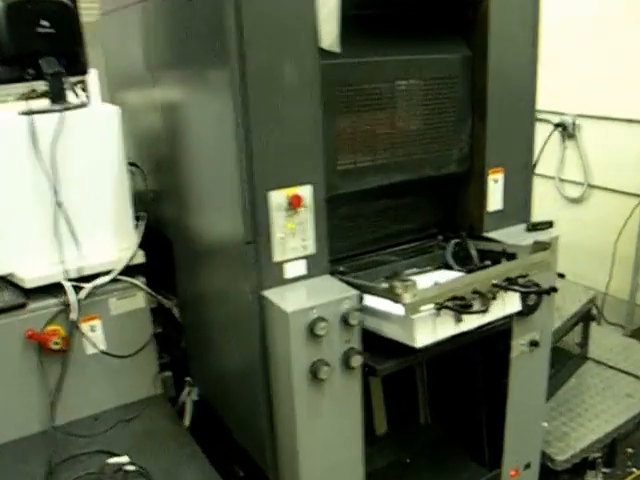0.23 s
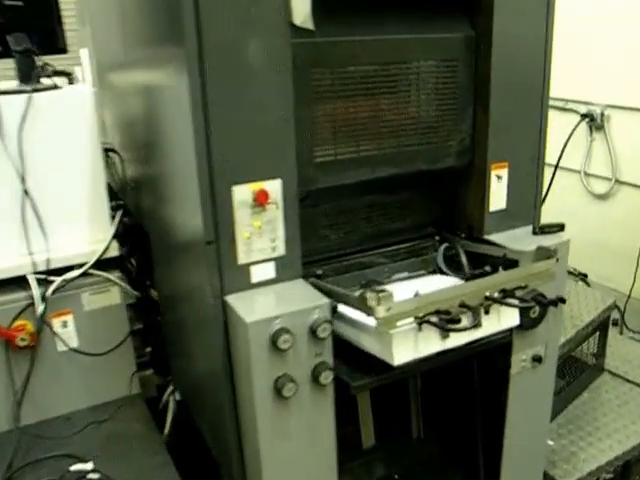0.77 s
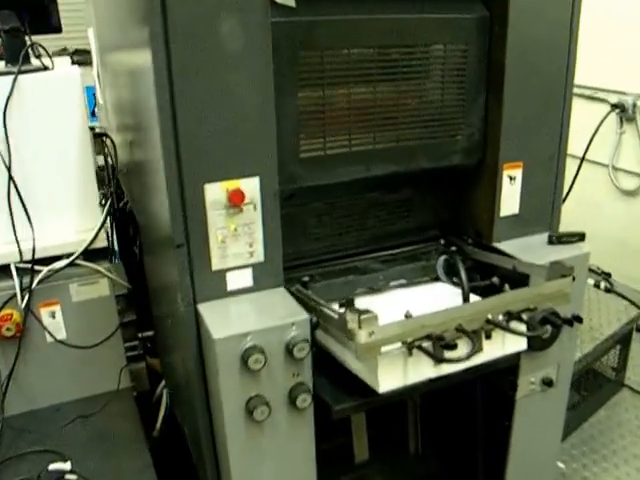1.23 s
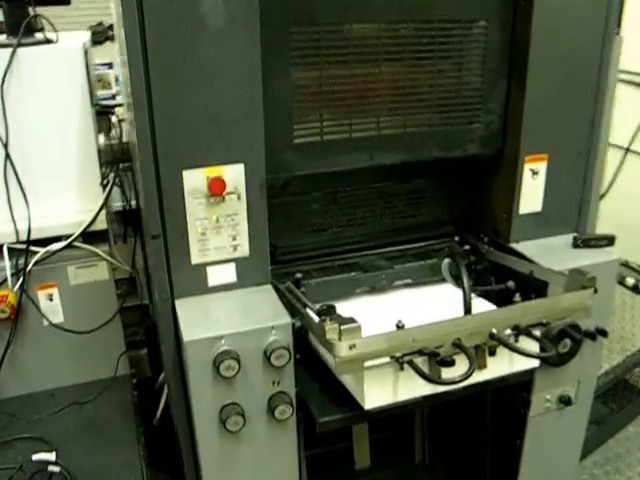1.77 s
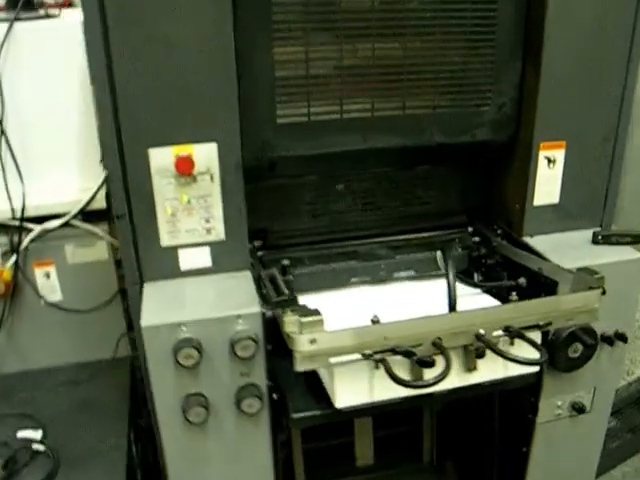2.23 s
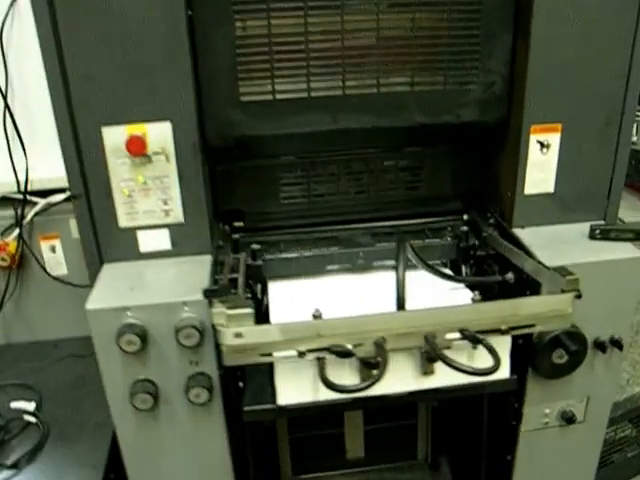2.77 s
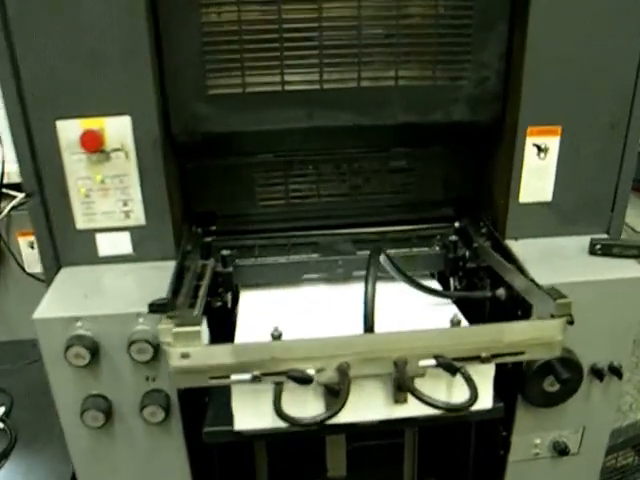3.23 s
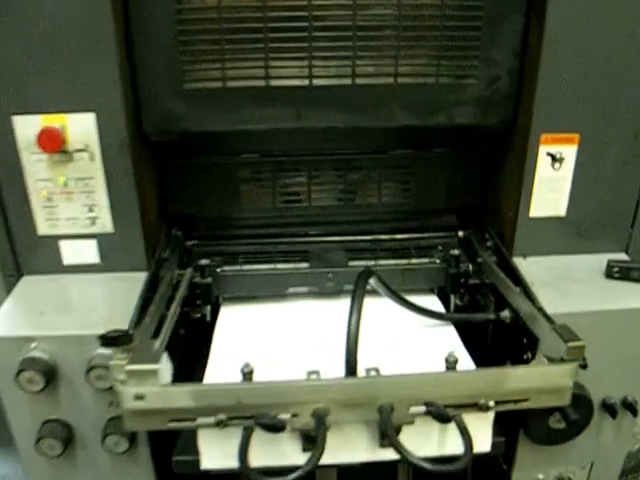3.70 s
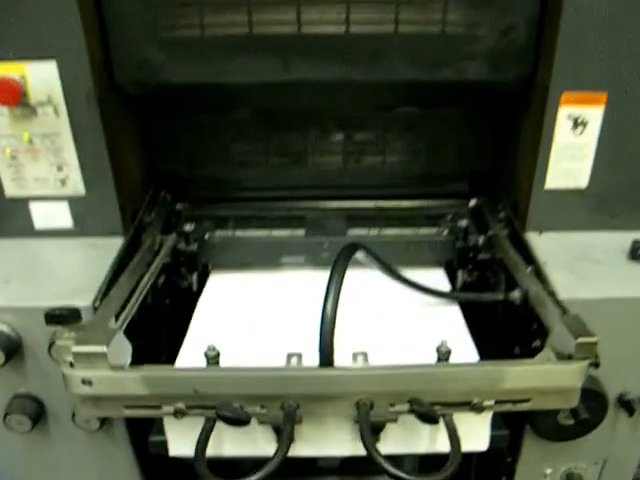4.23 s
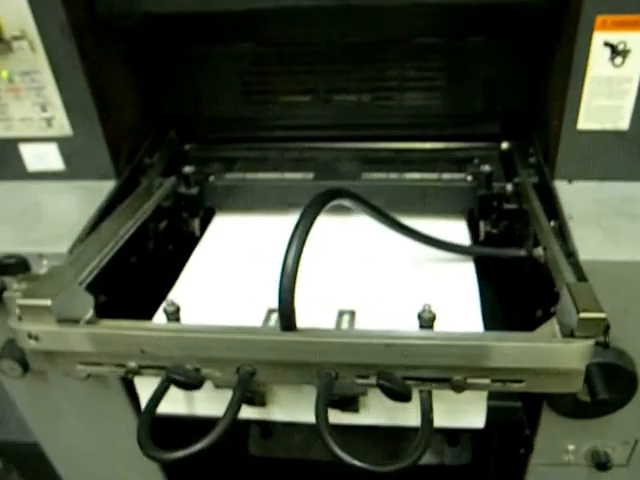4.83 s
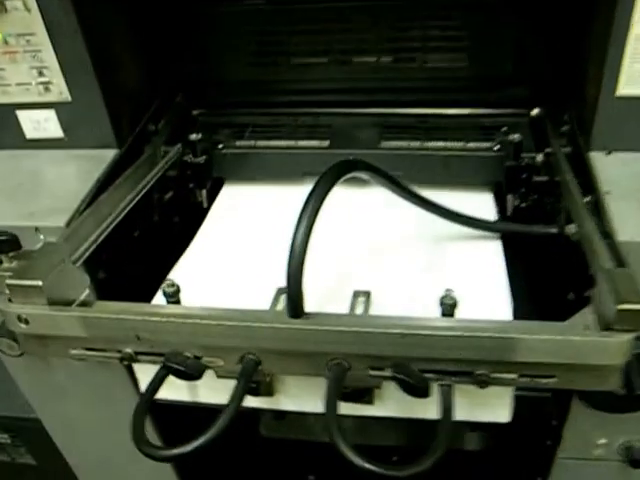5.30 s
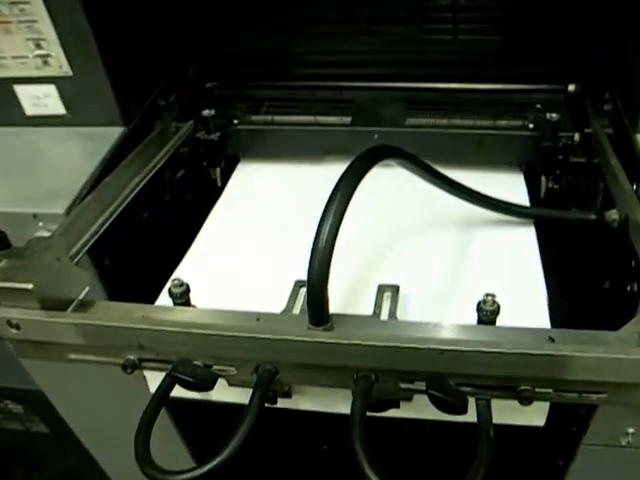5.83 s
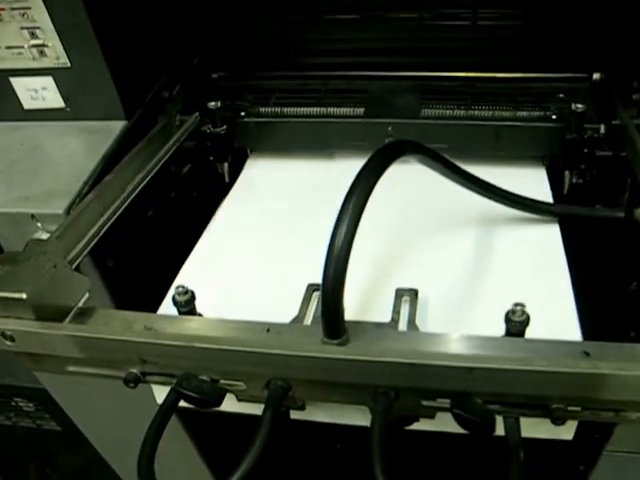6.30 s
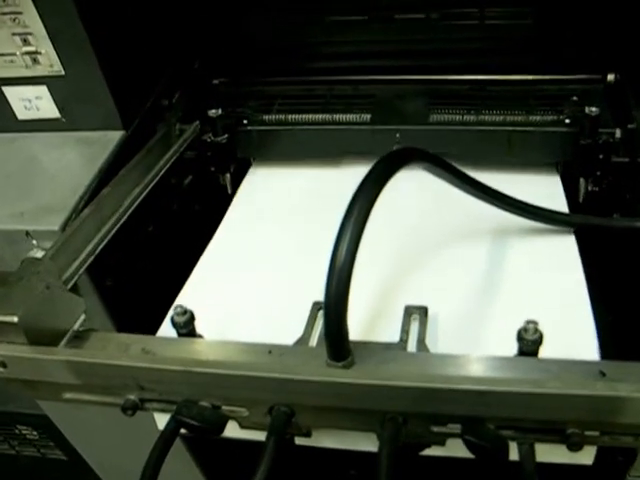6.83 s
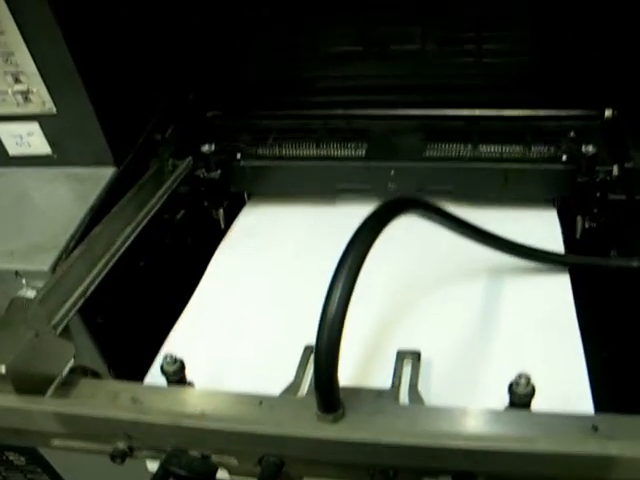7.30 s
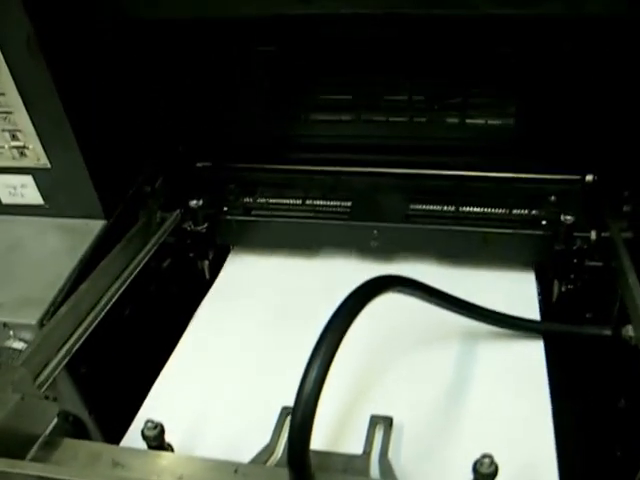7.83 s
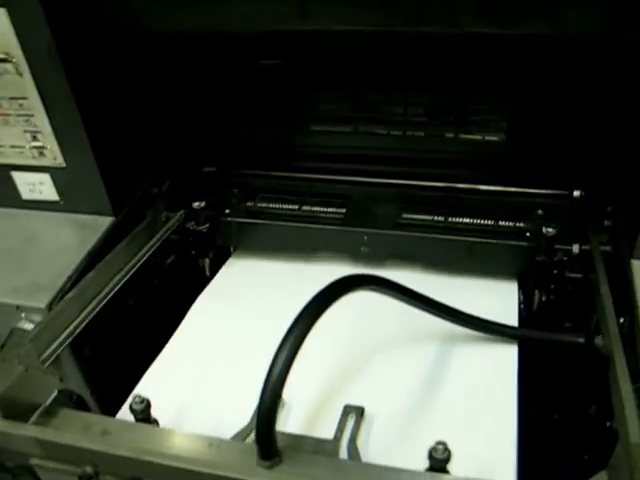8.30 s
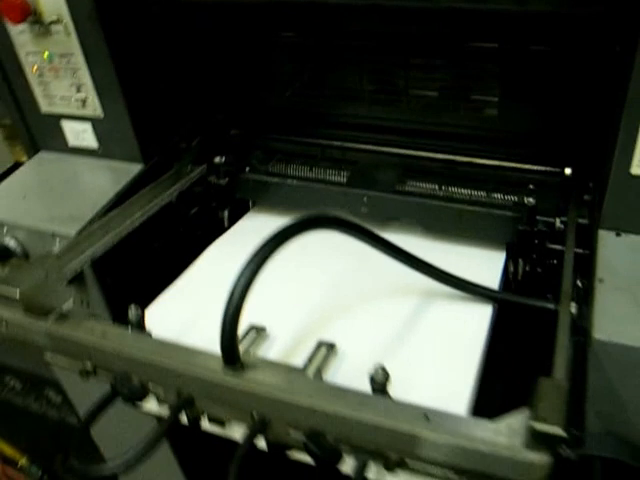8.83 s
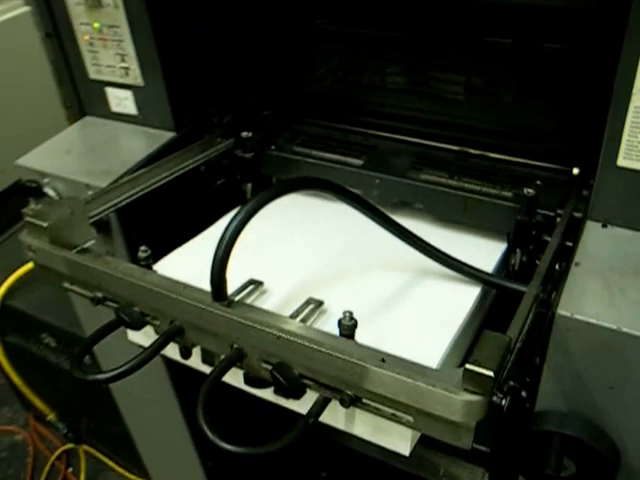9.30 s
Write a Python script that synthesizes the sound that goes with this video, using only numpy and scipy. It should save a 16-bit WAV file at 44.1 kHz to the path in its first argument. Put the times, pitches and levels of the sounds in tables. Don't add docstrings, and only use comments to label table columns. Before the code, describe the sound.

A printing press runs in an indoor shop. About twice a second a gripper clamp clacks loudly, followed by the same quick train of slaps, knocks, snaps and clicks. Rollers roar with chain rattle, suction valves puff, and frame, pump and gears hum beneath. A small, dull-sounding microphone moves closer, overloading on the clamps and dipping briefly after each.

```python
import sys
import numpy as np
from scipy import signal
from scipy.fft import rfft, irfft, next_fast_len
from scipy.io import wavfile
from scipy.ndimage import uniform_filter1d, map_coordinates

SR = 44100
rng = np.random.default_rng(int(sys.argv[2]) if len(sys.argv) > 2 else 0)


def wav_record(signal):
    frames = np.transpose(np.atleast_2d(signal))
    bounded = np.clip(frames, -1, 1)
    quanta = np.round(bounded * 32767).astype(np.int16)
    wavfile.write(sys.argv[1], SR, quanta)


def ratio_of_db(decibels):
    return 10 ** (np.asarray(decibels, float) / 20)


N = 421155
T = np.arange(N) / SR

# time in s, peak in dB, jaws in dB, seating blow in dB,
# overload tick in dB.
CLAMP = [(0.052, -13.5, 0, -7.5, -77.5), (0.565, -5.5, -7, -7, -36), (1.078, -6, -7, -9.5, -35),
         (1.589, -3, -11.5, -11.5, -30), (2.102, -5, -8.5, -7.5, -32), (2.614, -4.5, -2, -4.5, -24),
         (3.126, -5.5, -1.5, -6.5, -27), (3.638, -4, -6.5, -7, -33), (4.15, -4.5, -6.5, -3, -25.5),
         (4.662, -5, -11, -5, -32), (5.174, -4, -9, -4, -30.5), (5.685, -5, -3, -8, -25),
         (6.197, -5.5, -3, -5.5, -25), (6.707, -2.5, -13.5, -6, -35.5), (7.22, -5.5, -7, -5, -34.5),
         (7.731, -5.5, -2, -10.5, -28.5), (8.243, -6.5, -17, -5.5, -39), (8.754, -5, -4.5, -9, -38.5),
         (9.267, -5, -9, -9, -33)]
# delay after it in s, level from afar in dB,
# level from near in dB, scatter in dB, share of crack (a ratio).
TRAIN = [
    (.035, -21.5, -13, 1, 0.26),
    (.0395, -16, -3.5, 1.9, .03),
    (.217, -13, -19, 2, 1.1),
    (.260, -19.5, -12.5, 2, 0.3),
    (.308, -11.5, -10.5, 0.6, 2.6),
    (0.338, -19.5, -17, -1, 0.81),
    (.350, -22.5, -11, 1.5, .23),
    (.393, -16, -10, -0.2, .21),
    (0.423, -12.5, -6, 3.8, .4),
    (.431, -14.5, -14, -0.6, .55),
]
# time in s, roller roar in dB, suction air in dB.
RUN = [(0.0, -15.5, -20.5), (9.55, -18.5, -21.5)]


def unit(x):
    return x / np.sqrt(np.mean(x ** 2) + 1e-20)


def curves(rows, at=T):
    s, *columns = np.transpose(rows)
    return [np.interp(at, s, column) for column in columns]


def wobble(rate):
    knots = rng.standard_normal(int(N * rate / SR) + 4)
    return map_coordinates(knots, [T * rate])


def coloured(x, points):
    m = next_fast_len(N + 8192)
    hz, db = np.transpose(points)
    log_hz = np.log(np.fft.rfftfreq(m, 1 / SR) + 1)
    gain = ratio_of_db(np.interp(log_hz, np.log(hz + 1), db))
    return irfft(rfft(x, m) * gain, m)[..., :N]


def since_clamp():
    s = np.transpose(CLAMP)[0] - .002
    s = np.r_[2 * s[0] - s[1], s]
    return T - s[np.searchsorted(s, T, side="right") - 1]


def swells(centre, width):
    turn_s = np.diff(np.transpose(CLAMP)[0]).mean()
    away = (since_clamp() - centre[:, None] + turn_s / 2) % turn_s - turn_s / 2
    return np.exp(-(away / width[:, None]) ** 2)


def contacts(events, ring, crack, rise=0.0011, lead=0.001753, scatter=0.7):
    out = np.zeros(N + SR)
    t = np.arange(SR // 10) / SR
    hz, level_db, t60 = np.transpose(ring)[:, :, None]
    for s, db in events:
        luck = scatter * rng.standard_normal((3, len(ring), 1))
        decay = ratio_of_db(level_db + 1.7 * luck[0] - 60 * t / t60)
        modes = decay * np.sin(2 * np.pi * hz * (1 + .02 * luck[1]) * t + luck[2])
        snap = crack * ratio_of_db(-60 * t / 0.036) * rng.standard_normal(len(t))
        onset = 1 - np.exp(-t / rise)
        out[round((s - lead) * SR):][:len(t)] += ratio_of_db(db) * (modes.sum(0) + snap) * onset
    return out[:N]


def gripper_clamp():
    # frequency in Hz, level in dB, t60 in s.
    clamp_ring = [(330, -17, .04), (665, -2, .04), (790, 2, .035), (880, -4, .03), (1080, -12, .025),
                  (1370, -10, .03), (2450, -16, .015), (2950, -18, .015)]
    jaw_ring = [(1250, -2.5, 0.0071), (2470, 1, 0.011), (2900, -4, 0.0053), (3460, -3, .006)]
    seat_ring = [(900, -17, 0.037), (1424, 4.5, 0.035), (1474, -7, .03), (1660, 5.5, 0.023),
                 (2060, -14.5, 0.017)]
    s, boom_db, jaw_db, seat_db, _ = np.transpose(CLAMP)
    boom = contacts(zip(s, boom_db + 3.0), clamp_ring, crack=0.21, rise=0.00049, lead=.0006, scatter=0.38)
    jaws = contacts(zip(s - .0012, jaw_db - 1.5), jaw_ring, crack=0.27, rise=0.00049, lead=0.00032)
    seat = contacts(zip(s + 0.0046, seat_db - 3.5), seat_ring, crack=0.59)
    return boom + jaws + seat


def train_timing():
    # time in s, nearness (0 afar to 1 near).
    nearness = [(0, 0.0087), (2.1, 0.48), (4.2, 1), (6.2, 1.16), (9.55, 0.75)]
    # time in s, change in dB.
    hard = [(.091, 6), (.600, 3), (.785, 7.5), (.902, -5.5), (1.298, 12.5), (4.458, -3), (2.015, -7),
            (2.362, 10), (2.53, -1.5), (2.949, 4.5), (3.045, 3.5), (3.551, 0), (4.062, 1), (4.544, 3.5),
            (4.574, 0.5), (5.055, 1), (5.566, 3), (5.899, 9), (7.528, -1.5), (6.59, -0.5), (6.62, 1.5),
            (7.017, -1), (7.132, 3), (7.14, 0), (7.644, -3), (8.154, -3.5), (8.552, 1), (8.668, 2.5),
            (9.061, -6.5), (9.18, -7)]
    play_s = .001
    clamp_s = np.transpose(CLAMP)[0]
    delay, far_db, near_db, scatter_db, _ = np.transpose(TRAIN)[:, :, None]
    luck = rng.standard_normal((2, len(TRAIN), len(CLAMP)))
    s = clamp_s + delay + play_s * luck[0]
    db = far_db + (near_db - far_db) * curves(nearness, s)[0] + scatter_db * luck[1]
    for when, more_db in hard:
        nearest = np.abs(clamp_s + delay - when).argmin()
        s.flat[nearest] = when
        db.flat[nearest] += more_db
    return s, db


def contact_train():
    # frequency in Hz, level in dB, t60 in s.
    slap_ring = [(1310, -8, 0.034), (2360, -0.5, 0.03), (2920, -4, 0.039)]
    bounce_ring = [(567, 2.4, 0.022)]
    lift_ring = [(696, -9.5, 0.028), (1330, -11.5, 0.017), (2420, -11, .02), (3170, -7, 0.022)]
    puff_ring = [(630, 1, 0.026), (1030, -4.5, 0.059), (2320, -15, 0.017)]
    snap_ring = [(730, -2.5, 0.009), (1290, -4.5, 0.028), (2050, -11, 0.03), (2286, -6, 0.058),
                 (2968, -6, 0.03), (3300, -13.5, 0.018), (3400, -6, 0.036)]
    cam_ring = [(1280, -3, 0.057), (1810, -1, 0.12), (2320, 0, 0.045), (2407, -0.5, 0.03),
                (2660, -10.5, 0.015)]
    knock_ring = [(133, -12, 0.016), (413, -12, 0.023), (561, -5.5, 0.097), (647, -0.5, .06),
                  (895, -1, 0.0097), (1110, -3.5, 0.045), (1580, -4.5, 0.04)]
    link_ring = [(770, -7.5, 0.018), (950, -11, 0.13), (1212, -2, 0.049), (1300, 0.5, 0.011),
                 (2350, -8, 0.03)]
    stop_ring = [(580, -8.5, 0.058), (1210, -5.5, 0.012), (1279, -0.5, 0.028), (1900, -6.5, 0.009),
                 (3630, -14, 0.019)]
    tick_ring = [(130, -12, 0.043), (326, 3, 0.069), (497, 8, 0.011), (1360, -.5, 0.026), (2850, -1, 0.046),
                 (2907, -4.5, .025), (3220, -7, 0.016), (3700, -9.5, .015)]
    rings = [slap_ring, bounce_ring, lift_ring, puff_ring, snap_ring,
             cam_ring, knock_ring, link_ring, stop_ring, tick_ring]
    clatter = np.zeros(N)
    for s, db, ring, part in zip(*train_timing(), rings, TRAIN):
        clatter += contacts(zip(s, db), ring, crack=part[-1])
    return clatter


def patchy(depth_db):
    z = signal.stft(rng.standard_normal(N + 512), nperseg=512)[2]
    field = uniform_filter1d(rng.standard_normal(z.shape), size=4, axis=0)
    field = uniform_filter1d(field, size=6, axis=1)
    return signal.istft(z * ratio_of_db(depth_db * unit(field)), nperseg=512)[1][:N]


def rollers():
    # time after the clamp in s, half width in s, swell in dB.
    load = [(.015, .03, 2.5), (.235, 0.033, 2.86), (0.352, 0.025, 4), (0.419, 0.048, 3.2),
            (.475, 0.027, -1.5), (.503, .008, -1)]
    # frequency in Hz, density in dB per Hz.
    roar_colour = [(60, -43.5), (100, -31.5), (130, -15), (180, -6), (280, -3), (420, 1), (500, -3),
                   (700, -2.5), (1200, -8), (2000, -10.5), (3000, -16.5), (4500, -20)]
    at, width, more_db = np.transpose(load)
    load_db = -1.1 + more_db @ swells(at, width)
    chance = rng.random((3, N))
    struck = chance[0] < 600 / SR
    rattle = struck * np.sign(chance[1] - .5) * ratio_of_db(-4 * np.log(chance[2] + 0.021))
    roar = unit(coloured(patchy(depth_db=1.0) + 0.6 * unit(rattle), roar_colour))
    return ratio_of_db(curves(RUN)[0] + load_db) * roar


def suction_air():
    # time after the clamp in s, half width in s, blast in dB.
    valves = [(.21, 0.12, -1.5), (.268, 0.041, 0.5), (.33, .02, -6), (.42, 0.023, -5.5), (.46, .025, -.5),
              (.492, 0.012, 4)]
    # frequency in Hz, density in dB per Hz.
    air_colour = [(300, -38.5), (700, -6), (1200, -13), (1900, -19.5), (2500, -3.5), (3200, -10.5),
                  (4500, -6.5)]
    at, width, open_db = np.transpose(valves)
    leak_db = -6.5
    blast = ratio_of_db(leak_db) + ratio_of_db(open_db) @ swells(at, width)
    air = unit(coloured(patchy(depth_db=2.0), air_colour))
    return blast * ratio_of_db(curves(RUN)[1] + 0.32 * wobble(36)) * air


def tone(hz, db, drift):
    phase = 2 * np.pi * np.cumsum(hz + 0 * T) / SR
    return np.sqrt(2) * ratio_of_db(db) * np.sin(phase + drift * wobble(9))


def frame_drone():
    # time after the clamp in s, half width in s, fundamental in dB,
    # octave in dB.
    frame = [(.01, 0.02, -47, -35), (.058, 0.025, -24.5, -42), (.165, .02, -43.5, -26.5),
             (0.219, 0.017, -34.5, -24.5), (.27, .014, -26.5, -30), (.30, 0.02, -29, -25),
             (.36, .015, -28.5, -28.5), (.385, 0.022, -24, -34.5), (0.47, 0.036, -22, -27.5)]
    # fundamental in dB, octave in dB.
    frame_rest_db = (-46.5, -36)
    frame_hz = 199.3
    at, width, *peak_db = np.transpose(frame)
    level = ratio_of_db(np.array(frame_rest_db))[:, None] + ratio_of_db(np.array(peak_db)) @ swells(at, width)
    low_db, octave_db = 20 * np.log10(level)
    low = tone(frame_hz, low_db + 0.49 * wobble(11), drift=0.81)
    return low + tone(2 * frame_hz, octave_db + 1.2 * wobble(15), drift=1.2)


def pump():
    # multiple of the stroke rate, level in dB rms, unsteadiness in dB.
    orders = [
        (1, -32.5, 2.5),
        (2, -36, 4),
        (3, -33.5, -0.5),
    ]
    # time in s, change in dB.
    nearer = [(0, -23), (4.2, 0.5), (5, 4.5), (9.55, 7)]
    pump_hz = 233.6
    hum = np.zeros(N)
    for multiple, db, sway_db in orders:
        k = round(multiple)
        nearer_db = curves(nearer)[0] if k == 2 else 0
        hum += tone(k * pump_hz, db + nearer_db + sway_db * wobble(9), drift=1.05)
    return hum


def gear_whine():
    # time in s, level in dB rms.
    whine = [(.3, -34.5), (1.35, -27.5), (1.6, -36), (2.1, -32), (3.2, -54), (3.45, -31.5), (5.6, -29.5),
             (7, -37.5), (8.6, -37), (9.2, -27), (9.55, -33.5)]
    mesh_hz = 1332
    mesh = tone(mesh_hz, curves(whine)[0] + 0.37 * wobble(2.5), drift=0.25)
    return mesh + tone(2 * mesh_hz, -45 + 2.5 * wobble(6.6), drift=0.83)


def mains_hum():
    return tone(120.5, -49 + 6.0 * wobble(6.8), drift=0.74)


def shop(x):
    t = np.arange(SR // 2) / SR
    tail = rng.standard_normal(len(t)) * ratio_of_db(-60 * t / 0.23) * (t > .006)
    return signal.fftconvolve(x, tail / np.linalg.norm(tail))[:N]


def scene():
    hits = gripper_clamp() + contact_train()
    shudder_db = 0.88 * wobble(70)
    rush = ratio_of_db(shudder_db) * (rollers() + suction_air())
    hum = frame_drone() + pump() + gear_whine() + mains_hum()
    return (rush + hum + hits + ratio_of_db(-9.5) * shop(hits))[None]


def gain_control():
    # time in s, depth in dB, level regained in dB.
    duck = [(0.05, -1, -0.07), (1.6, -6.5, -0.06), (2.6, -6.5, -0.14), (6.2, -6.5, 0), (8.2, -5.5, 0.12),
            (9.3, -3.5, 0.5)]
    recovered_s, climb_s = 0.28, 0.18
    t = since_clamp()
    depth_db, regained_db = curves(duck, T - t)
    falling = np.clip((t - .006) / 0.01, 0, 1)
    climbing = np.clip((recovered_s - t) / climb_s, 0, 1)
    return ratio_of_db(depth_db * falling * climbing + regained_db * (3.5 - climbing))


def microphone_hiss():
    # frequency in Hz, density in dB per Hz.
    hiss = [(30, -8), (100, 0.5), (300, 1.5), (3000, -1.5), (4200, -8.5), (4500, -27)]
    return ratio_of_db(-52.5) * unit(coloured(rng.standard_normal(N), hiss))


def jolts():
    # time in s, level in dB.
    bumps = [(0.068, -41), (2.466, -37), (5.863, -30), (6.472, -42), (6.868, -38), (9.064, -34)]
    return sum(ratio_of_db(db + 7.5) * np.exp(-((T - s - .024) / 0.0026) ** 2) for s, db in bumps)


def spikes(s, db):
    out = np.zeros(N)
    out[np.round(s * SR).astype(int)] = ratio_of_db(db) * np.sign(rng.standard_normal(len(s)))
    return out


def ticks():
    # time in s, peak in dB.
    overloads = [(1.517, -33), (1.93, -53.5), (1.9359, -36.5), (2.456, -41.5), (2.535, -47.5),
                 (3.0469, -24.5), (3.4773, -55.5), (4.072, -53), (4.1466, -32.5), (5.01, -31.5),
                 (5.5695, -39), (5.5956, -50.5), (6.6222, -38), (7.127, -51), (7.14, -32.5), (8.164, -31.5)]
    # time after it in s, level in dB relative to its loudest.
    tops = [
        (-.0002, -5),
        (.0012, -.5),
        (.0024, -14),
        (.0055, -17.5),
    ]
    # frequency in Hz, gain in dB.
    corner = [(4000, -57.5), (4500, 0), (8000, -6), (15000, -20)]
    dull = [(4000, -60), (4500, 2), (5500, -9.5), (7000, -31.5), (9000, -60.5)]
    clamp_s, *_, over_db = np.transpose(CLAMP)
    after, under_db = np.transpose(tops)[:, :, None]
    luck = rng.standard_normal((2, len(tops), len(CLAMP)))
    s, db = np.transpose(overloads)
    around = np.tile(np.r_[s, clamp_s[1:]], reps=3)
    dull_s = around + .014 * rng.standard_normal(len(around))
    dull_ticks = spikes(dull_s, -37 + 5 * rng.standard_normal(len(around)))
    s = np.r_[s, (clamp_s + after + .0003 * luck[0]).ravel()]
    db = np.r_[db, (over_db + under_db + 2.1 * luck[1]).ravel()]
    return coloured(spikes(s, db + 16), corner) + coloured(dull_ticks, dull)


def low_pass(x):
    return signal.sosfilt(signal.butter(12, 15850, fs=SR, output="sos"), x)


def record(dry):
    # frequency in Hz, gain in dB.
    response = [(20, -44.5), (90, -5), (150, -2.5), (3000, 1.5), (3600, -4.5), (4000, -13), (4250, -18),
                (4500, -32), (4800, -61.5)]
    offset = -.042
    band_edge = [(3900, 0), (4300, -4.5), (4480, -8), (4620, -40), (4800, -60)]  # (Hz, dB)
    x = coloured(dry * gain_control(), response) + microphone_hiss() + jolts() + offset
    for ceiling in (.67, .69):
        x = x / (1 + np.abs(x / ceiling) ** 14) ** (1 / 14)
        x = coloured(x - offset, band_edge) + offset
    return low_pass(x + ticks())


dry = scene()
out = record(dry)
wav_record(out)
```